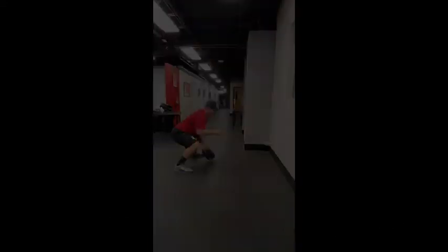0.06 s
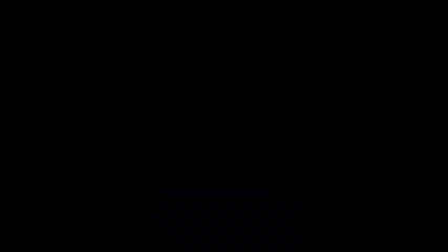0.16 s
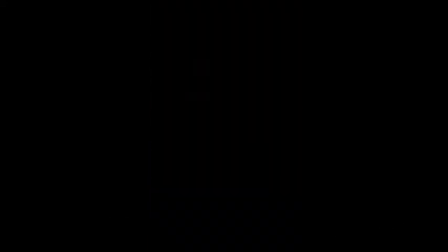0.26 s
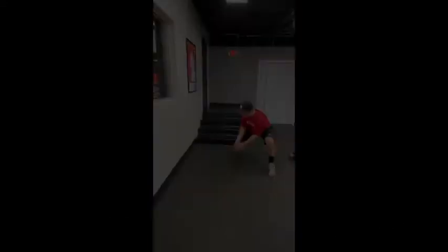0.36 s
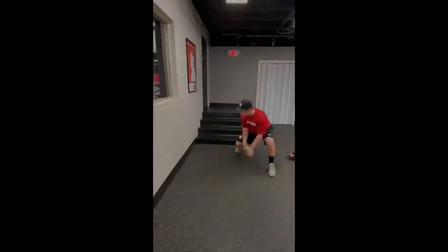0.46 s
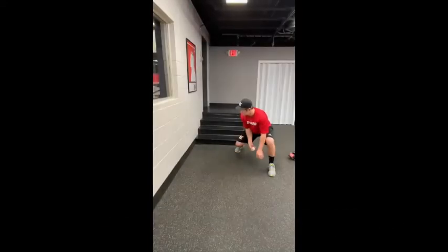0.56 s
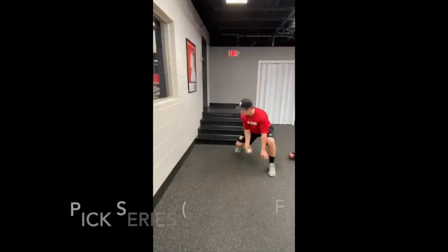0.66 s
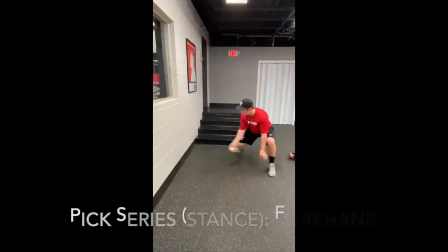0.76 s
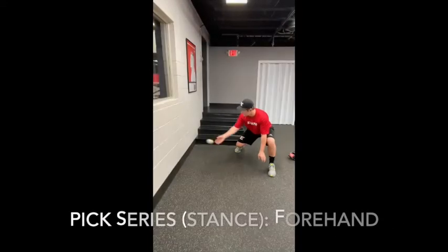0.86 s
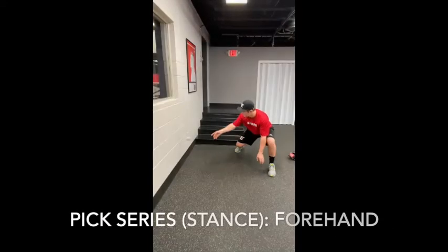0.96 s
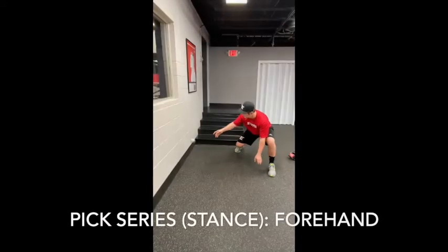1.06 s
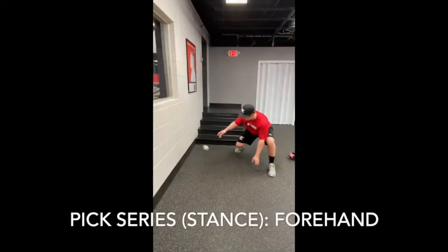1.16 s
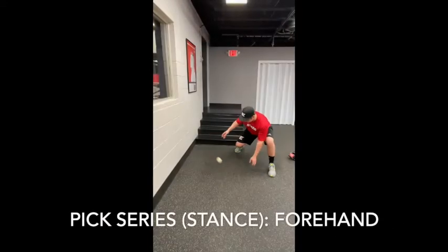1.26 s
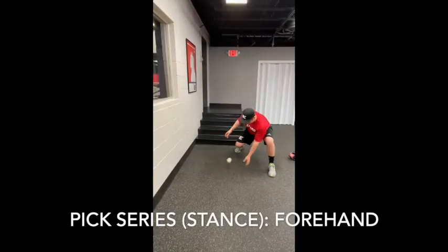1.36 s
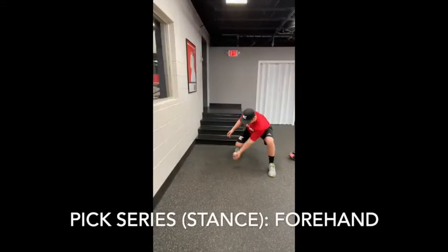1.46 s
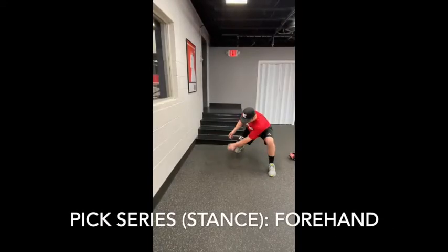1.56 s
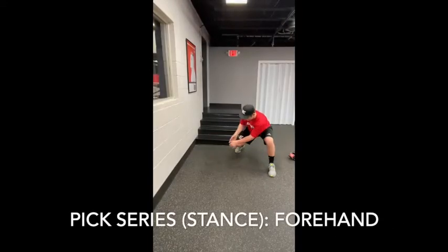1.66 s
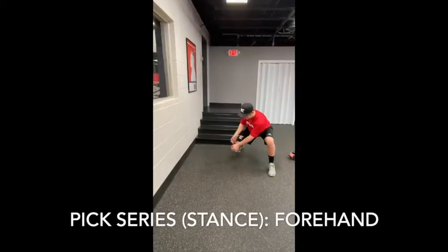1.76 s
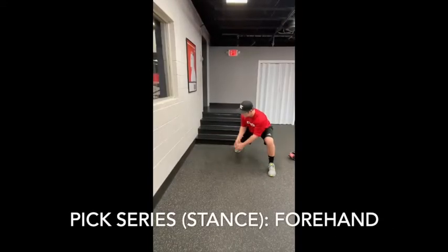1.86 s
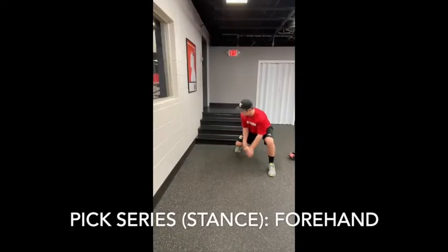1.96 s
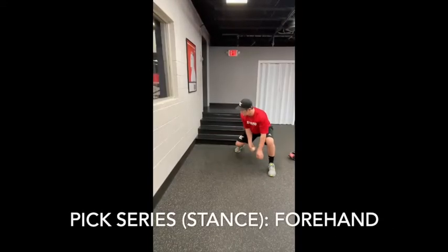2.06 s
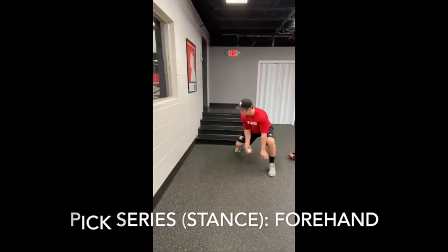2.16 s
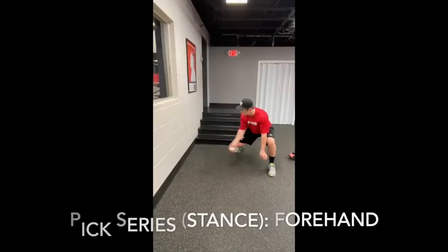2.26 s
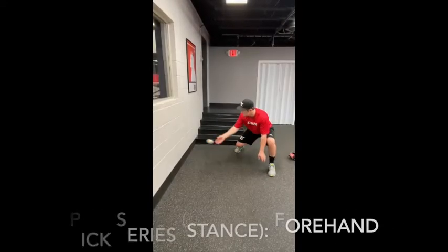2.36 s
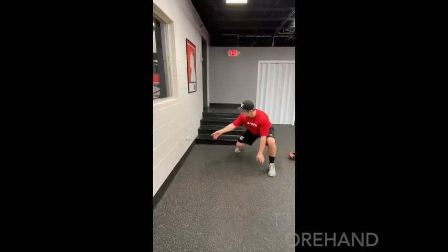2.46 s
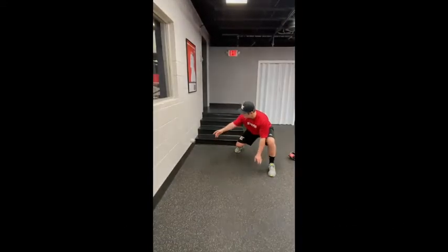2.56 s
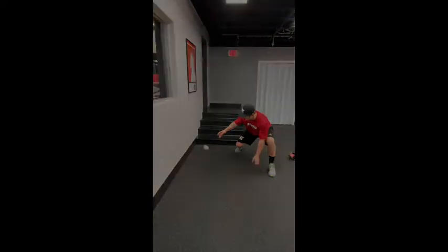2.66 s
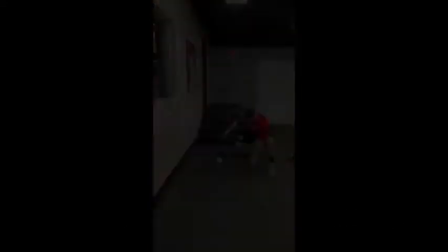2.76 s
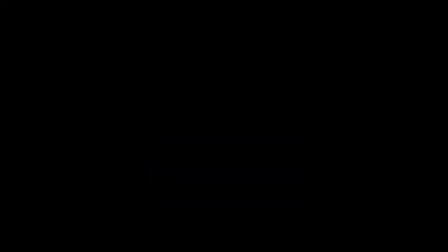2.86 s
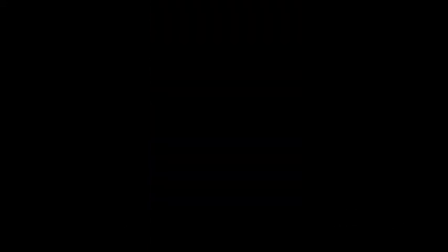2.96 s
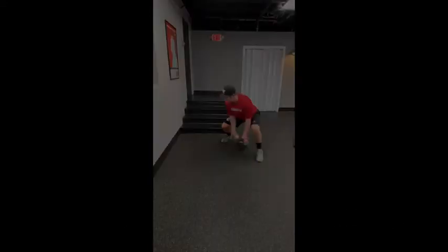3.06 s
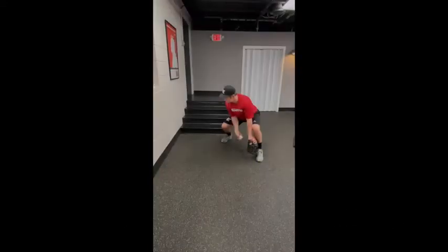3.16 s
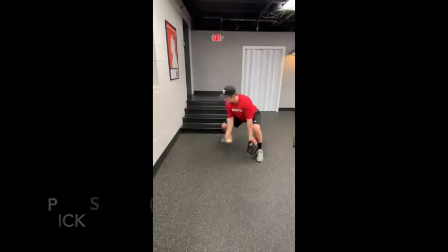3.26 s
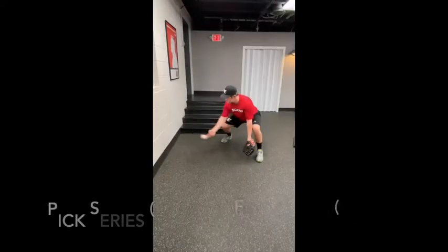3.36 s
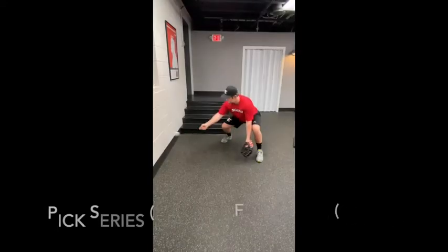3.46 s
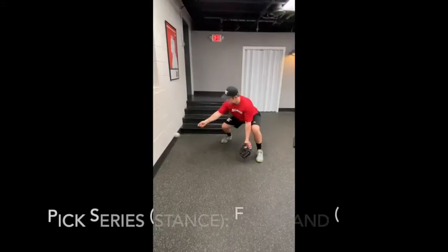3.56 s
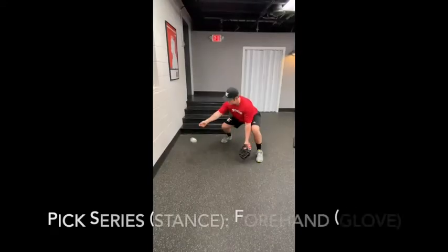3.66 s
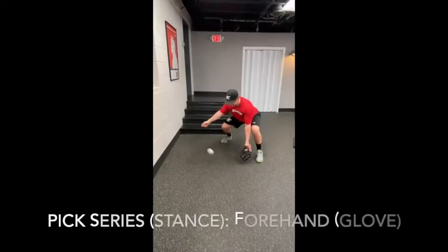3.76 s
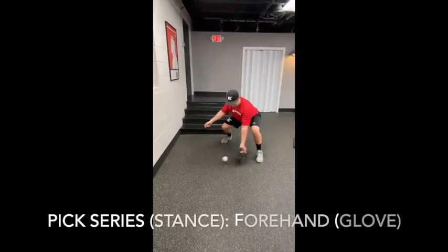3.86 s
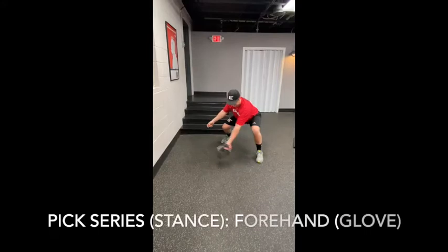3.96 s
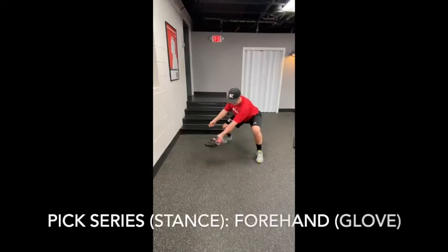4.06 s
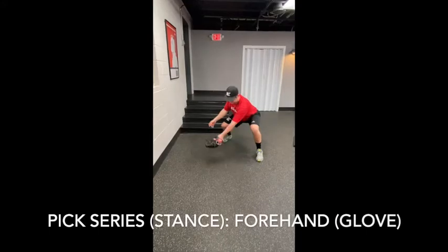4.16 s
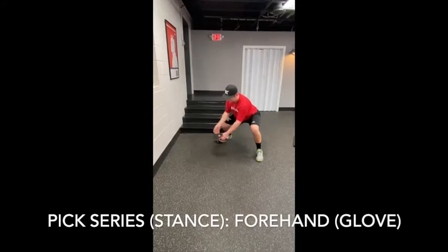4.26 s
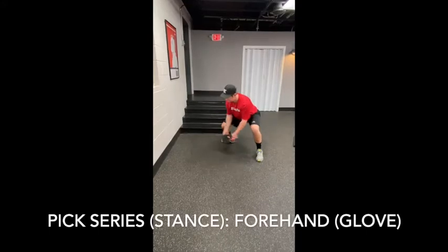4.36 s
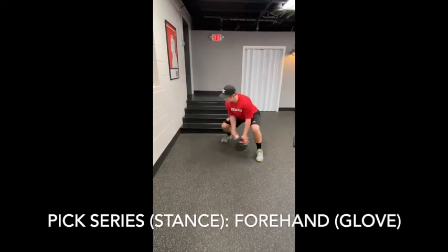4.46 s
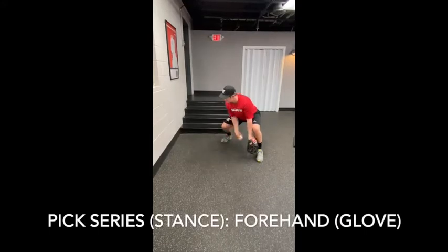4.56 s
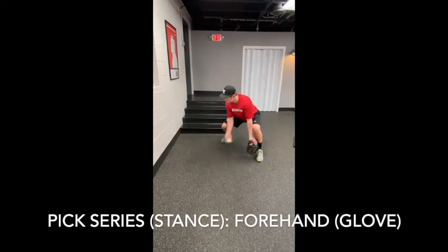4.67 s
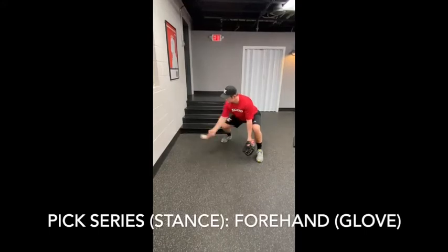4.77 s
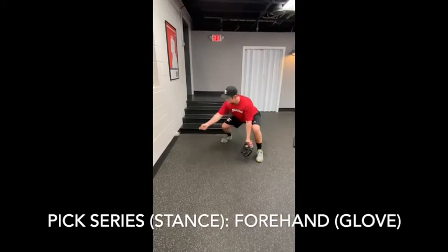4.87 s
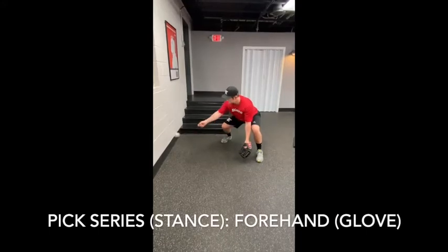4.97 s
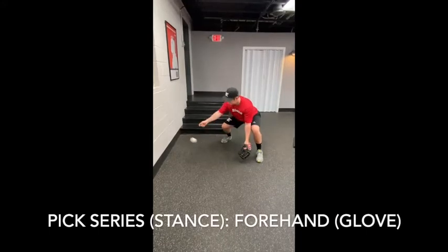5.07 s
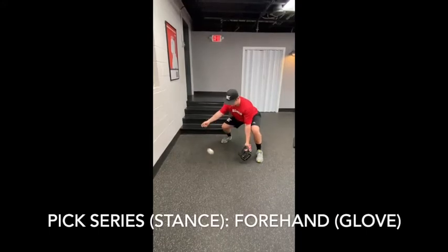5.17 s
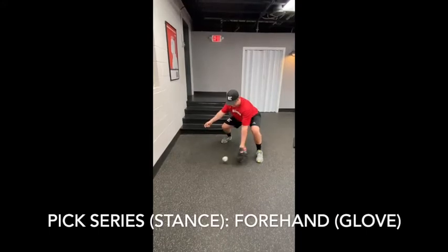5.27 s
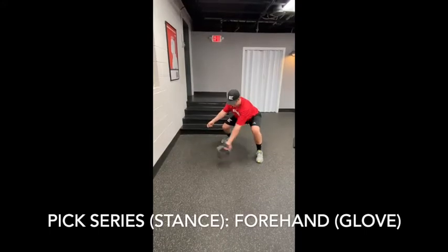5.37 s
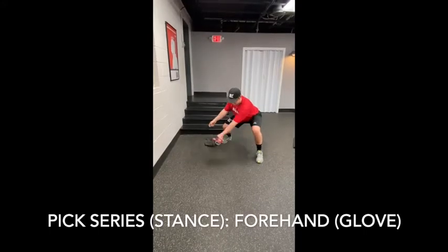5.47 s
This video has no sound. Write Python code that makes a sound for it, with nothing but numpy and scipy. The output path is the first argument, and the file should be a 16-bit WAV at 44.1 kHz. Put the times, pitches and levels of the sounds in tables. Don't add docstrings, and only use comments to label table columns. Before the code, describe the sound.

In a hard indoor hallway, a baseball thuds hollowly on a block wall, skips sharply off rubber floor and slaps brightly into a bare palm. The round repeats, its end fading. Then two harder throws boom on the wall, skip more quietly and land softly in a leather glove. Low ventilation rumbles throughout; a phone-like stereo microphone a few metres away hears long hall echoes, and the sound stops abruptly.

```python
import sys
import numpy as np
from scipy import signal
from scipy.fft import rfft, irfft, next_fast_len
from scipy.io import wavfile
from scipy.ndimage import uniform_filter1d

SR = 44100
rng = np.random.default_rng(int(sys.argv[2]) if len(sys.argv) > 2 else 0)


def persist_wave(psi):
    counts = np.round(np.clip(psi, -1, 1) * 32767).astype(np.int16)
    wavfile.write(sys.argv[1], SR, np.atleast_2d(counts).T)


def boost(x):
    u = np.asarray(x, float) / 20
    return 10 ** u


N = 243431
SPAN = next_fast_len(N)
SIZE = 65536
HZ = np.fft.rfftfreq(SIZE, 1 / SR)

# start in seconds, level in dB, treble in dB, hall in dB, pitch stretch of the colour.
WALL_HITS = [
    (0.9853, -12, 0.5, -28, 1),
]
HARD_WALL_HITS = [
    (3.5078, -7, 0.0062, -27, 0.97),
]
FLOOR_SKIPS = [
    (1.2970, -17, 1, -24, 0.92),
]
HARD_FLOOR_SKIPS = [
    (3.8346, -22, 1, -22.5, 0.89),
]
BRIGHT_CATCHES = [
    (.355, -43.5, 25, -17, 0.81),
    (1.441, -35, 13, -18, 0.79),
    (1.4484, -12, 12, -29, 0.75),
    (1.713, -47.5, 19, -10.5, 0.72),
    (2.951, -45.5, -0.5, -16.5, 1.1),
    (3.9375, -27.5, -1.5, -32, 0.77),
    (3.9208, -28.5, 1, -25.5, 0.9),
    (4.111, -43, -17, -20.5, 0.73),
    (4.287, -46, -8, -21, 2.4),
    (4.3325, -35, -4, -21.5, 0.93),
]
GLOVE_CATCHES = [
    (.2, -47.5, 3.5, -9, 1.16),
    (3.9265, -29.5, -12.5, -24, 0.97),
    (3.9365, -32, 8, -28, 1.7),
]
LEATHER_TICKS = [
    (3.199, -61, 0, -51, 0.85),
    (3.343, -66, 0, -38, 1.64),
]
OPENING_CATCH = [
    (.0723, -35, 8.8, -22, 0.85),
]

# frequency in Hz, level in dB per Hz.
WALL = [
    [(150, -18.5), (250, 3.5), (400, 4), (600, 0), (850, -30.5), (1150, -26), (1650, -35), (2400, -29), (3400, -40.5), (4800, -27), (6500, -35), (8500, -44), (11000, -36)],
    [(100, -12.5), (150, -4), (250, -3), (400, -3.5), (620, -7.5), (780, -14.5), (1150, -30), (1650, -32), (2500, -31.5), (3700, -38.5), (5000, -30), (6500, -34), (8500, -47.5), (11000, -42.5)],
]
HARD_WALL = [
    [(150, -5.5), (250, 3), (400, 1.5), (600, 0.5), (1000, -3), (1350, -38), (1750, -15), (2200, -33), (3400, -25.5), (4800, -26), (6500, -33.5), (8500, -35), (11000, -35.5)],
    [(100, -19), (150, -6.5), (250, -6.5), (400, -4.5), (600, -6), (850, -14.5), (1080, -17), (1400, -30.5), (2400, -30.5), (3400, -37), (4800, -32.5), (6500, -32.5), (8500, -43.5), (11000, -38.5)],
]
FLOOR = [
    [(150, -15.5), (250, -10.5), (400, 9), (600, 10), (850, -22), (1150, -4), (1650, 10.5), (2400, -2.5), (3400, -9.5), (4800, -8), (6500, -6), (8500, -31), (11000, -20)],
    [(100, -17), (150, 2), (250, 0), (400, 4.5), (600, 0.5), (850, -2.5), (1150, -2.5), (1650, -5.5), (2400, -8.5), (3400, -10), (4800, -12.5), (6500, -13.5), (8500, -31), (11000, -30.5)],
]
HARD_FLOOR = [
    [(150, -10.5), (250, 15.5), (400, -4.5), (600, 0.5), (850, -4), (1150, -1), (1650, 2.5), (2400, -4), (3400, -9.5), (4800, -8.5), (6500, -14), (8500, -29), (11000, -23)],
    [(100, 3), (150, 11.5), (250, -29), (400, 5), (600, -7), (850, -21), (1150, -7.5), (1650, -9.5), (2400, -12), (3400, -13.5), (4800, -22.5), (6500, -27), (8500, -26), (11000, -31)],
]
HAND = [
    [(300, -37), (850, 4), (1650, 9), (2600, 3), (4000, -2), (6500, 0), (8800, -4.5), (11000, -10)],
    [(300, -8), (850, 0), (1650, -5.5), (2600, -3), (4000, -4), (6300, -2), (8800, -8.5), (11000, -15.5)],
]
GLOVE = [
    [(140, -5.5), (450, 1.5), (1150, -20.5), (2400, -17.5), (4800, -20.5), (8500, -28), (11000, -22)],
    [(140, -3), (450, -3.5), (1150, -6), (2400, -14.5), (4800, -22), (8500, -38), (11000, -20.5)],
]
TICK = [
    [(500, -35), (850, -16), (1000, 13), (1200, 9), (2000, -23), (3000, -8), (5000, -41.5)],
    [(500, -22), (1000, 11), (2000, -37), (5000, -51)],
]

# frequency in Hz, level in dB, T60 in seconds.
WALL_MODES = [(124.3, -17, 1), (155.85, -1.5, 0.45), (180, -23.5, 0.3), (273, -6.5, 0.084),
              (296.3, -13, 0.83), (367, -1.5, 0.36), (417, -12, 0.53), (537, -15, 0.39), (598, -12.5, 0.17),
              (650, -12, 0.9), (78.8, -3, 0.82)]
# delay in ms, level in dB.
ECHOES = [(3.2, -12.5), (7.2, -10.5), (10.5, -9.5), (18.5, -17), (27.0, -12.5)]
# frequency in Hz, T60 in seconds.
HALL_T60_S = [(100, 0.58), (260, 1.167), (700, 0.86), (1800, 1.04), (4800, 0.68), (7500, 0.55),
              (12000, 0.29)]
# frequency in Hz, dB up left and down right.
HALL_PAN_DB = [(100, -0.4), (300, -0.9), (800, -0.5), (2500, 1.5), (8000, 0.1)]
# frequency in Hz, left over right in dB.
DIRECT_PAN_DB = [(150, 23), (450, -15.5), (1200, 3), (4000, 8), (10000, -7)]
# frequency in Hz, left-right likeness from 0 to 1.
LIKENESS = [(60, .97), (130, 1), (290, 0.84), (600, 0.72), (1400, 0.13), (15000, 0.2)]
# frequency in Hz, level in dB.
MICROPHONE_DB = [(22, -2.5), (45, 1), (11500, 0), (12500, -7.5), (13000, -26), (13600, -22), (14100, -3.5),
                 (15800, -11), (16600, -46)]

# frequency in Hz, level in dB per Hz.
AIR = [(25, -9.5), (78, 1.5), (100, -2), (180, -12), (290, -9.5), (450, -20.5), (650, -17), (800, -36.5),
       (2000, -48.5), (6000, -42), (12000, -55), (14000, -59.5)]
# frequency in Hz, level in dB per Hz.
CLOTH = [(150, -7.5), (400, -1), (1000, 4), (2500, -10), (6000, -14.5), (12000, -24.5)]
SLEEVE = [(1000, -24), (3000, -10), (5500, 7), (8000, -5), (11000, 7), (15000, -0.5)]

# peak in seconds, level in dB, treble in dB, rise in dB per s, fall in dB per s.
DYING_ECHOES = [
    (.24, -49, -13, 31, 65),
    (3.0, -63.5, -10.5, 42, 43.5),
]
SWISHES = [
    (.365, -74, 0, 900, 130),
    (.79, -83, 0.021, 150, 155),
    (3.33, -75.5, 0, 150, 170.4),
    (4.3, -76, 0, 120, 100),
]
OPENING_ECHO = [
    (.1, -48.5, -10.5, 70, 55.6),
]

# time in seconds, rumble in dB.
DUCT_SURGES = [(0.3, -50), (0.404, -46), (0.432, -54), (0.5, -51), (0.88, -58.5), (0.928, -47.5),
               (1.642, -47.5), (1.658, -51), (1.74, -48),
               (3.02, -54.5), (3.068, -45), (3.322, -51), (3.392, -59), (3.422, -53), (3.572, -45),
                (3.634, -49.5), (4.23, -48), (4.4, -50.5)]

HAND_JUMP_S, HAND_ROUND_SAMPLES = 1.744, 66216
GLOVE_JUMP_S, GLOVE_ROUND_SAMPLES = 4.405, 61802
WALL_MODES_DB, HALL_RISE_MS, PORT_LAG_SAMPLES = -11.5, 2.8, 20
RUMBLE_HZ, RUMBLE_WIDTH_HZ, MOTOR_HZ, MOTOR_WIDTH_HZ = 51.8, 14.2, 120, 7.9
MOTOR_DB, AIR_DB = -63.5, -59
HALL_BOOM_DB, HALL_BOOM_T60_S, HALL_BOOM_RISE_S = -34, 1.21, 0.24
CROSSFADE_FROM_S, CROSSFADE_S, SPLICE_S = 2.577, 0.68, 0.0023
FADE_IN_S, END_S, OPENING_VENT_DB = 0.55, 5.512, -6


def at_hz(points, hz):
    table = np.array(points)
    return np.interp(np.log(np.maximum(hz, 1)), np.log(table[:, 0]), table[:, 1])


def in_time(rows):
    s, *columns = np.transpose(rows)
    return [np.interp(np.arange(N) / SR, s, column) for column in columns]


def ease(start_s, length_s):
    return np.sin(np.pi / 2 * np.clip((np.arange(N) / SR - start_s) / length_s, 0, 1)) ** 2


def rms_one(x):
    return x / np.sqrt(np.mean(x ** 2) + 1e-20)


def late(ms):
    return np.exp(-2j * np.pi * HZ * ms / 1000)


def stereo_noise(points, size):
    hz = np.fft.rfftfreq(size, 1 / SR)
    mid, side = rfft(rng.standard_normal((2, size)))
    alike = np.clip(at_hz(LIKENESS, hz), -1, 1)
    pair = np.sqrt(1 + alike) * mid + np.sqrt(1 - alike) * side * [[1], [-1]]
    ports = np.exp(-2j * np.pi * hz * PORT_LAG_SAMPLES / SR * np.array([[0], [1]]))
    return ports * boost(at_hz(points, hz)) * pair


def duct_tone(hz, width_hz):
    hump = 1 / (1 + ((np.fft.rfftfreq(SPAN, 1 / SR) - hz) / width_hz) ** 4)
    tone = irfft(stereo_noise([(1, 0), (2, 0)], SPAN) * hump, SPAN)[:, :N]
    return tone / np.sqrt(uniform_filter1d(np.mean(tone ** 2, axis=0), size=5000))


def hall_boom():
    t, ring = np.arange(N) / SR, 0
    for s, db, *_ in WALL_HITS + HARD_WALL_HITS + FLOOR_SKIPS + HARD_FLOOR_SKIPS:
        decay_db = 60 * np.maximum(t - s, 0) / HALL_BOOM_T60_S
        ring = ring + boost(HALL_BOOM_DB + db - decay_db) * ease(s, HALL_BOOM_RISE_S)
    return ring


def ventilation():
    rumble_db, = in_time(DUCT_SURGES)
    rumble = boost(rumble_db) * duct_tone(RUMBLE_HZ, RUMBLE_WIDTH_HZ)
    motor = (boost(MOTOR_DB) + hall_boom()) * duct_tone(MOTOR_HZ, MOTOR_WIDTH_HZ)
    air = boost(AIR_DB) * rms_one(irfft(stereo_noise(AIR, SPAN), SPAN)[:, :N])
    return (rumble + motor + air) * boost([[-0.5], [0.5]])


def rustle(rows, colour):
    hiss = rms_one(irfft(stereo_noise(colour, SPAN), SPAN)[:, :N])
    treble = signal.lfilter(*signal.butter(1, 2500, "high", fs=SR), hiss)
    t, out = np.arange(N) / SR, 0
    for s, db, treble_db, rise, fall in rows:
        swell = boost(db - rise * np.maximum(s - t, 0) - fall * np.maximum(t - s, 0))
        out = out + swell * (hiss + (boost(treble_db) - 1) * treble)
    return out


def direct_path():
    half_db = at_hz(DIRECT_PAN_DB, HZ) / 2
    return np.array([boost(half_db), boost(-half_db) * late(1000 * PORT_LAG_SAMPLES / SR)])


def hall(modes):
    t, tail = np.arange(SIZE) / SR, 0
    noise = stereo_noise(HALL_PAN_DB, SIZE)
    noise[1] *= boost(-2 * at_hz(HALL_PAN_DB, HZ))
    for centre_hz in 40 * 2 ** np.arange(0, 9, 0.5):
        band = np.clip(1 - 2 * np.abs(np.log2(np.maximum(HZ, 1) / centre_hz)), 0, 1)
        tail = tail + irfft(noise * band) * boost(-60 * t / at_hz(HALL_T60_S, centre_hz))
    for mode_hz, db, t60_s in modes:
        spread = rng.normal(0, 1, (2, 1)) * np.clip(mode_hz / 500, 0, 1.5)
        phase = rng.uniform(0, 2 * np.pi) + spread
        tail += boost(db + WALL_MODES_DB - 60 * t / t60_s) * np.sin(2 * np.pi * mode_hz * t + phase)
    near = sum(boost(db) * late(ms + rng.uniform(-0.2, 0.2, (2, 1))) for ms, db in ECHOES)
    build_up = 1 - np.exp(-(1000 * t / HALL_RISE_MS) ** 2)
    return direct_path() + near, rfft(tail * build_up)


def blows(rows, colours, grit_ms, push_ms, push_hz, paths):
    t, out = np.arange(SIZE) / SR, np.zeros((2, N + SIZE))
    low = 1 / (1 + (HZ / push_hz) ** 4)
    timing = late(np.cumsum(0.1876 + low * push_ms) / np.arange(1, len(HZ) + 1))
    puff = rfft(rng.standard_normal(SIZE) * np.exp(-1000 * t / grit_ms))
    smear = np.exp(1j * (1 - low) * np.unwrap(np.angle(puff)))
    rumble_cut = HZ ** 2 / (HZ ** 2 + 90 ** 2)
    gate = np.clip(t / 0.00023, 0, 1) * (t < 1.4)
    direct, tail = paths
    for s, db, treble_db, hall_db, stretch in rows:
        tilt = boost(treble_db * HZ ** 2 / (HZ ** 2 + 2500 ** 2)) * timing * rumble_cut
        near, far = [tilt * boost(at_hz(colour, HZ / stretch)) for colour in colours]
        heard = irfft(near * smear * direct + far * boost(hall_db) * tail)
        level = boost(db) / np.abs(irfft(near)).max()
        at = round(s * SR)
        out[:, at:at + SIZE] += level * heard * gate
    return out[:, :N]


def catches(at_player):
    hand = blows(BRIGHT_CATCHES, HAND, 2.0, 1.37, 1007, at_player)
    glove = blows(GLOVE_CATCHES, GLOVE, 1.6, 2.39, 1410, at_player)
    return hand + glove + blows(LEATHER_TICKS, TICK, 6.1, 1.35, 1400, at_player)


def floor_skips(at_floor):
    soft = blows(FLOOR_SKIPS, FLOOR, 0.28, 0.85, 3900, at_floor)
    return soft + blows(HARD_FLOOR_SKIPS, HARD_FLOOR, 0.45, 0.62, 3250, at_floor)


def wall_hits(at_wall):
    soft = blows(WALL_HITS, WALL, 0.79, 2.54, 1420, at_wall)
    return soft + blows(HARD_WALL_HITS, HARD_WALL, 2.6, 2.72, 1780, at_wall)


def replay(x, jump_s, length):
    splice = ease(jump_s, SPLICE_S)
    return (1 - splice) * x + splice * np.roll(x, length, axis=1)


def scene():
    at_wall, at_floor, at_player = hall(WALL_MODES), hall([]), hall([])
    ducts = ventilation()
    rounds = ducts + rustle(DYING_ECHOES, CLOTH) + rustle(SWISHES, SLEEVE)
    rounds += catches(at_player) + floor_skips(at_floor) + wall_hits(at_wall)
    opening = rustle(OPENING_ECHO, CLOTH) + blows(OPENING_CATCH, HAND, 1.6, 1.405, 1016, at_player)
    opening += boost(OPENING_VENT_DB) * ease(0.054, 0.14) * (1 - ease(0.15, 0.085)) * ducts
    change = ease(CROSSFADE_FROM_S, CROSSFADE_S)
    hand_drill = ease(0, FADE_IN_S) * (1 - change) * replay(rounds, HAND_JUMP_S, HAND_ROUND_SAMPLES)
    glove_drill = change * replay(rounds, GLOVE_JUMP_S, GLOVE_ROUND_SAMPLES)
    return opening + hand_drill + glove_drill


def roll_off(x):
    return signal.sosfilt(signal.butter(12, 16970, fs=SR, output="sos"), x)


def record(dry):
    response = boost(at_hz(MICROPHONE_DB, np.fft.rfftfreq(SPAN, 1 / SR)))
    heard = irfft(response * rfft(dry, SPAN), SPAN)[:, :N]
    rounded = 0.55 * np.tanh(heard / 0.55)
    stop = np.clip((END_S - np.arange(N) / SR) / 0.00066, 0, 1)
    return roll_off(rounded * stop)


dry = scene()
out = record(dry)
persist_wave(out)
```